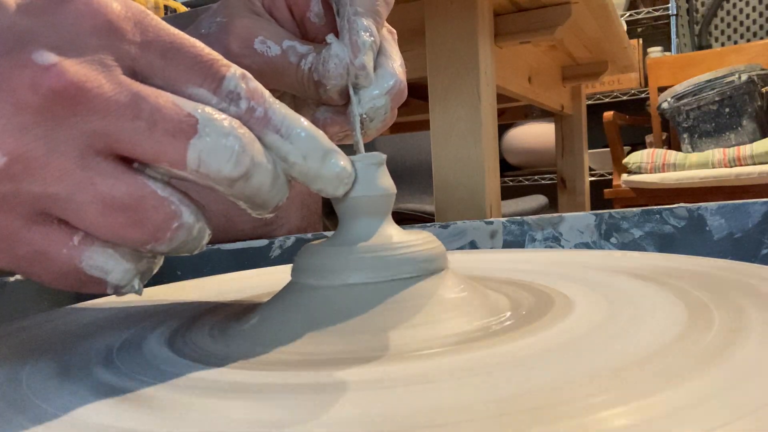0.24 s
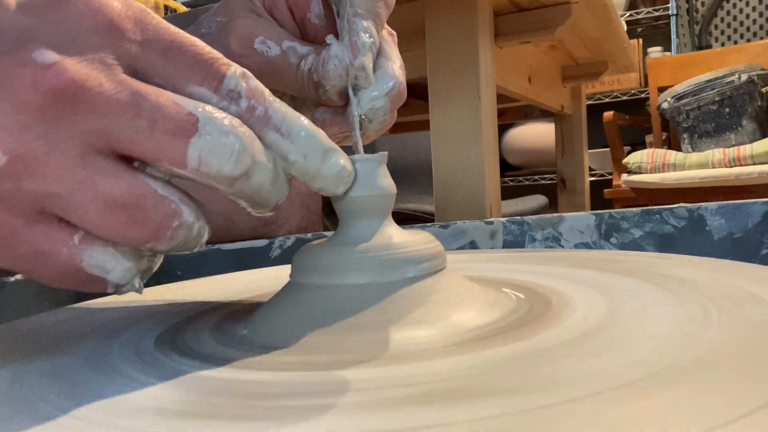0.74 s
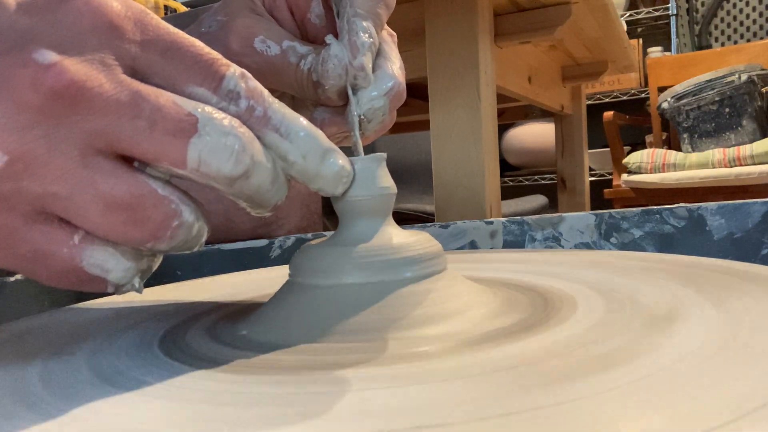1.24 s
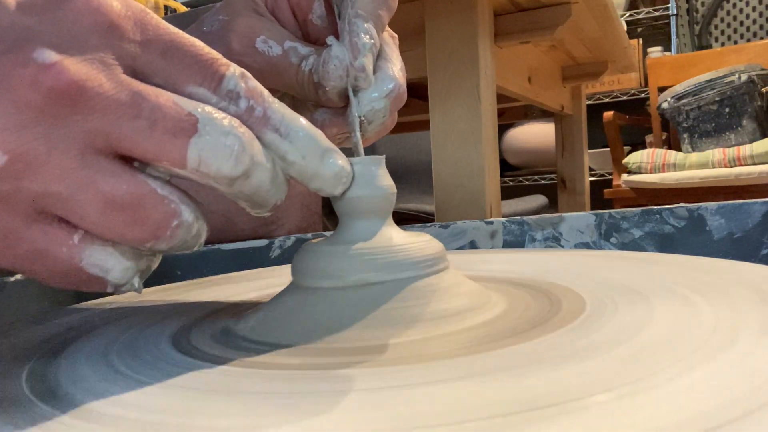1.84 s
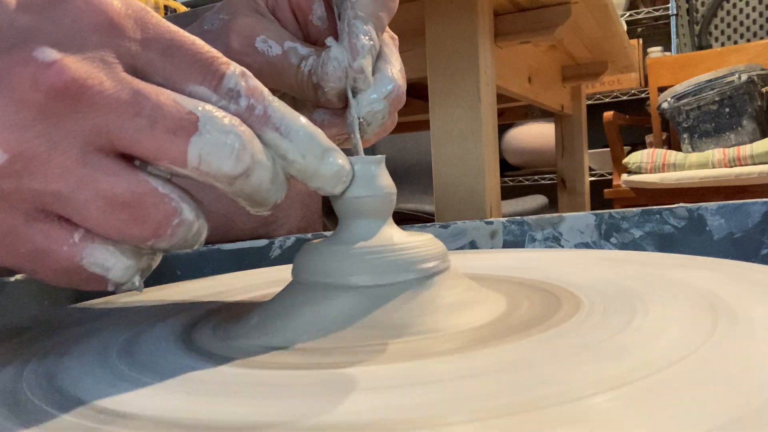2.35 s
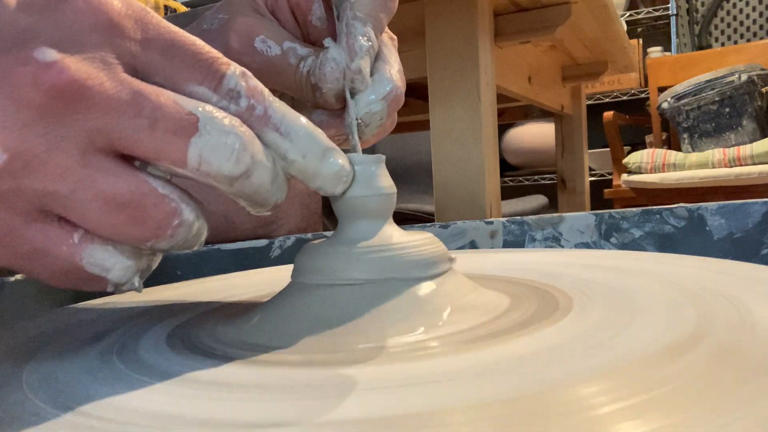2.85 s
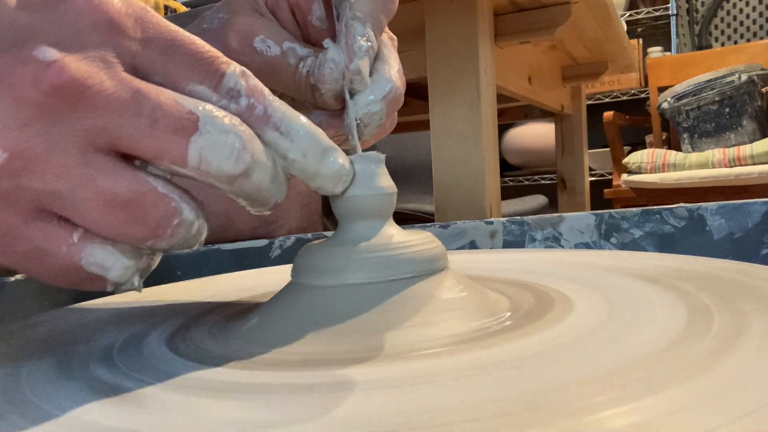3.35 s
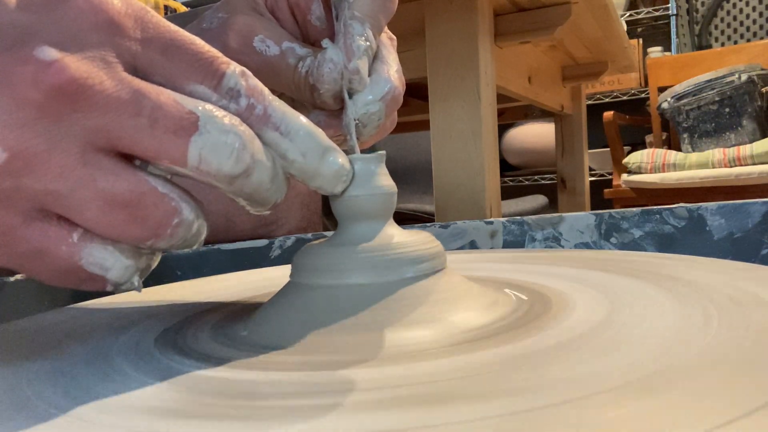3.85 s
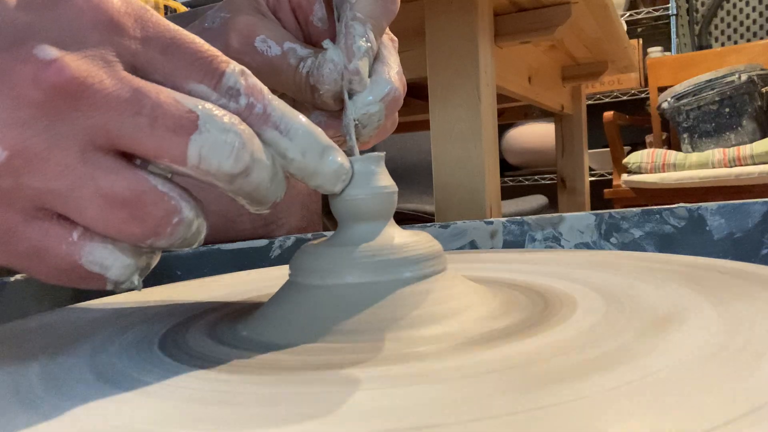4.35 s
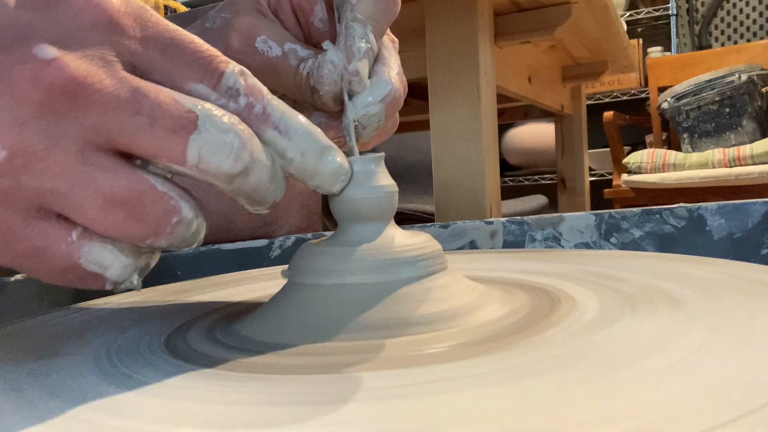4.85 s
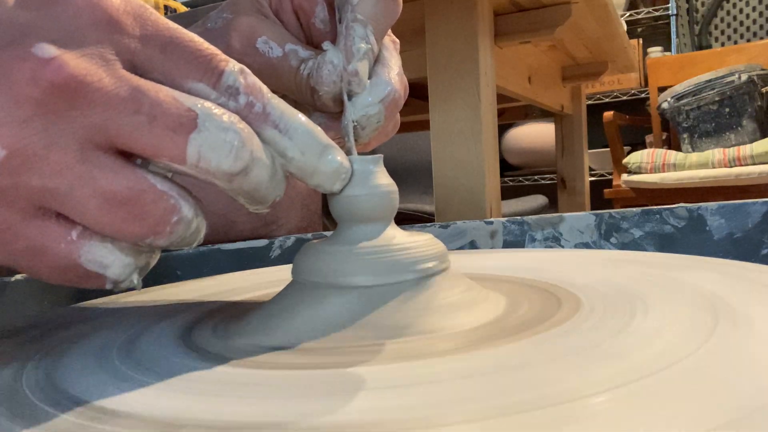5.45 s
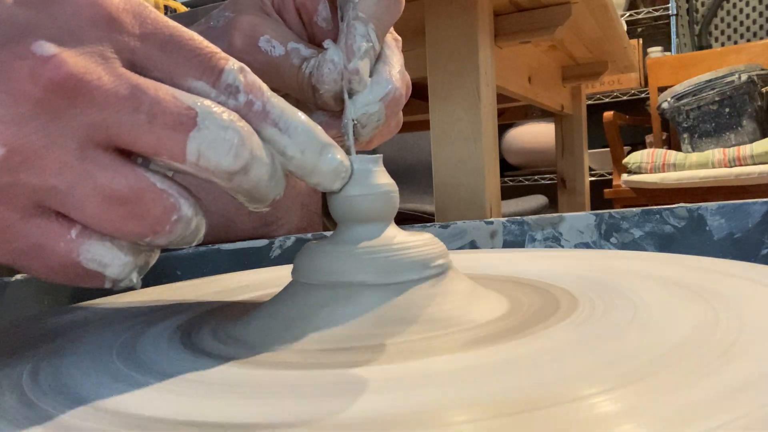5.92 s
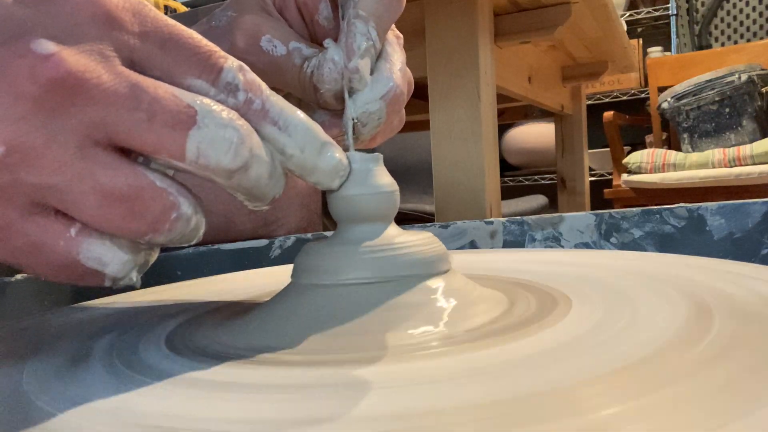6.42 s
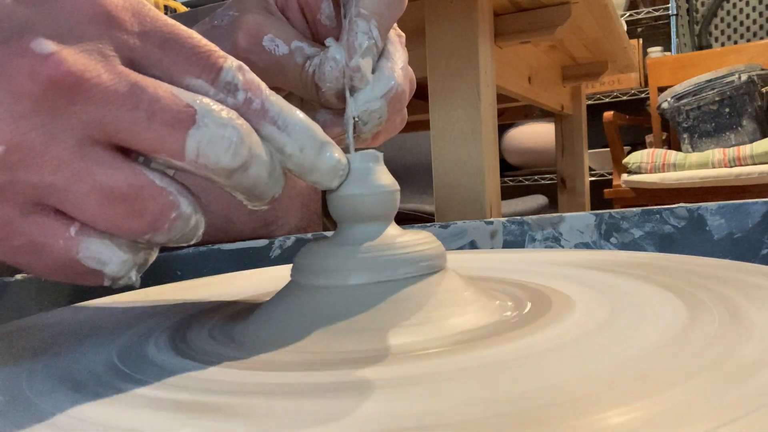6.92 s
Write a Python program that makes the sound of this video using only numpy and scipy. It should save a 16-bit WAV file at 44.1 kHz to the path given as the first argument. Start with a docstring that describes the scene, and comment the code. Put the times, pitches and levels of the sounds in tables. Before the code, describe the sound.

Steady pottery wheel motor in a studio, miked on the pan with little room sound. Low electrical hum and its octave pulse unevenly with wheel and belt, while a thin mid whine bends slightly up and down. Muffled frame knocks, light metallic ticks several times a turn and a brighter crack each half second continue throughout; no start or stop.

```python
"""On the splash pan of an electric potter's wheel stands a phone with two microphone ports; the wheel runs steadily.
The mains-fed motor hums at twice the line frequency, its brushes whine, and the tones throb with belt and wheel.
Bumps in belt and bearings ring the frame and the motor shell, and something in the drive ticks a few times a turn.
Noise pushes ring those modes as knocks, ticks, cracks and squeaks; the clay hisses once over a filtered-noise whirr."""
import sys
import numpy as np
from scipy import signal
from scipy.fft import rfft, irfft, next_fast_len
from scipy.io import wavfile
from scipy.ndimage import uniform_filter1d

SR = 44100
rng = np.random.default_rng(int(sys.argv[2]) if len(sys.argv) > 2 else 0)


def waveform_to_disk(signal):
    """Save audio, clipped to [-1, 1], as 16-bit WAV at the path in sys.argv[1]."""
    frames = np.transpose(np.atleast_2d(signal))
    scaled = np.clip(frames, -1, 1) * 32767
    samples = np.round(scaled).astype(np.int16)
    wavfile.write(sys.argv[1], SR, samples)


N = 316505
M = next_fast_len(N)
T, F = np.arange(N) / SR, np.arange(M // 2 + 1) * SR / M  # time in s, frequency in Hz
SPAN = 2 ** 14  # spectral bins around a mode that its drive fills
SLOW = SPAN * SR / M  # sample rate of such a drive, Hz
HUM_HZ, TURN_HZ, BELT_HZ = 120.07, 2.002, 2.246  # hum, turns of the wheel and laps of the belt per second
# the treble reaches the left port first: lag in s, and the frequency where both ports are in step
PORT_LAG_S, IN_STEP_HZ = 1.96e-4, 8700

# modes of frame and pan, before each sound's own widening and gain:
# [f/Hz, width/Hz, left level/dB per Hz, right level/dB per Hz, left leads/rad]
FRAME = [(93.4, 13, -77.5, -65.5, 1.5), (155, 18, -65, -63.5, 1.5), (182, 12, -66, -65.5, 2.1),
         (211, 24, -68, -65.5, -0.5), (256.2, 30, -68.5, -70.5, -1), (301.5, 33, -69, -70.5, -0.4),
         (362, 17.5, -64, -60.5, 3.5), (381, 18.2, -71, -68, 1.5), (404, 16, -66.5, -70.5, 0.9),
         (445, 24, -79.5, -74.5, 0), (466.2, 12.3, -66.5, -66, 0), (480.4, 6, -72.5, -69, -0.5),
         (518, 20, -85.5, -72.5, -2), (537.4, 14, -87, -72.5, -1.5), (647, 31.5, -80.5, -82, 1.5),
         (746, 34, -85.5, -82.5, -1.5), (917, 47, -89, -87, 1.4), (959, 5.2, -86.5, -79.5, 1.9),
         (996, 60, -98.5, -83.5, 3.5), (1103, 24, -89, -86.5, 1.1), (1170, 24, -88, -90.5, -0.5),
         (1283, 6.8, -83.5, -80, 1.3), (1298, 25.3, -86.5, -88, 1.24)]
# modes of the motor shell, before each sound's own widening and gain:
# [f/Hz, width/Hz, left level/dB per Hz, right level/dB per Hz, left leads/rad]
SHELL = [(1560, 40, -99, -97, 1.1), (1920, 20, -96, -97, 1.8), (2040, 60, -95, -88, -2.8),
         (2150, 90, -97, -89, 0.9), (2280, 50, -98, -90, 1.3), (2525, 90, -98, -90, 1.3),
         (2640, 40, -98, -92, -2.9), (2740, 30, -96, -87, 0.5), (2986, 26, -93, -89, -1.9),
         (3120, 60, -95, -93, 2.2), (3165, 16, -93, -89, -0.2), (3330, 120, -102, -95, 1.6),
         (3770, 60, -101, -97, 1.7), (3930, 200, -100, -98, 1.3), (4165, 110, -100, -98, 0.2),
         (4265, 70, -101, -99, 1.1), (4392, 12, -104, -94, 1.2), (5040, 20, -108, -101, -2.3),
         (5750, 130, -102.5, -100.5, 2.7), (6730, 70, -101, -102, 2.9), (7300, 60, -108, -107, -1.9),
         (8380, 170, -104, -104, -0.1), (8900, 200, -108, -108, 0.0), (9370, 150, -108, -108, 0.3),
         (9840, 60, -104, -104, 1.2), (10780, 60, -109, -109, 2.6), (11070, 30, -107, -107, 3.1),
         (12300, 60, -112, -112, -2.2), (13400, 80, -116, -116, 0.0), (14250, 60, -116, -116, -0.0)]


def undb(db):
    """Amplitude ratio of a level in dB."""
    return 10 ** (np.asarray(db) / 20)


def noise(*shape):
    """Complex noise of power 1."""
    return (rng.standard_normal(shape) + 1j * rng.standard_normal(shape)) / np.sqrt(2)


def walk(rate, size=N, sr=SR):
    """Random levels held 1 / rate s and slewed twice; spread near 1."""
    hold = int(sr / rate)
    steps = np.repeat(rng.standard_normal(size // hold + 1), hold)
    return 1.3 * uniform_filter1d(uniform_filter1d(steps, hold), hold)[:size]


def bump(s, width_s):
    """A smooth hump of height 1."""
    return np.exp(-.5 * ((T - s) / width_s) ** 2)


def sway(rows):
    """Sum of slow cosines locked to the off-centre wheel's turn and the uneven belt's lap."""
    total = 0
    for per_turn, per_lap, depth, crest_s in rows:
        sway_hz = round(per_turn) * TURN_HZ + round(per_lap) * BELT_HZ
        total = total + depth * np.cos(2 * np.pi * sway_hz * (T - crest_s))
    return total


def throb(db, rows, flicker, rate, extra=0):
    """Level in dB of a tone that sways with wheel and belt and flickers a little by chance."""
    amplitude = np.abs(1 + sway(rows) + extra + flicker * walk(rate))
    return db + 20 * np.log10(amplitude + 0.019)


def ports(left_db, right_db, lead):
    """Gain and phase of one source at the two ports; with a positive lead the left port is ahead in phase."""
    left = undb(left_db) * np.exp(.5j * lead)
    right = undb(right_db) * np.exp(-.5j * lead)
    return np.array([left, right]).reshape(2, -1)


def tone(db, phase, left_db, right_db, lead):
    """A sine at both ports, its rms level db plus each port's own gain."""
    return np.sqrt(2) * np.real(ports(left_db, right_db, lead) * undb(db) * np.exp(1j * phase))


def mode(hz, width_hz, f):
    """Steep band-pass response of one resonance, gain 1 at the centre."""
    return (1j * f * width_hz / (hz ** 2 - f ** 2 + 1j * f * width_hz)) ** 2


def add(out, drive, hz, width_hz, gains):
    """Ring one mode with a slow complex drive, shifted up to the mode; drive power 1 is 0 dB per Hz."""
    first = max(int(hz * M / SR) - SPAN // 2, 0)
    bins = slice(first, first + SPAN)
    spectrum = np.fft.fft(drive) * np.sqrt(M * SR / 2 / SPAN)
    out[:, bins] += gains * mode(hz, width_hz, F[bins]) * spectrum


def ringing(modes, flicker_db, rate, repeat, loose, surge_db):
    """Each mode is shaken by its own bumps, a share repeating every turn; all surge twice a turn and by chance.
    A loose share reaches each port by unrelated paths."""
    out = np.zeros((2, len(F)), complex)
    t = np.arange(SPAN) / SLOW
    surge = surge_db * np.cos(4 * np.pi * TURN_HZ * (t - .32)) + 0.76 * walk(3.05, size=SPAN, sr=SLOW)
    for hz, width, left, right, lead in modes:
        each_turn = np.resize(noise(round(SLOW / TURN_HZ)), SPAN)
        shared = np.sqrt(repeat) * each_turn + np.sqrt(1 - repeat) * noise(SPAN)
        drive = np.sqrt(1 - loose) * shared + np.sqrt(loose) * noise(2, SPAN)
        level = undb(surge + flicker_db * walk(rate, size=SPAN, sr=SLOW))
        add(out, drive * level, hz, 1.51 * width, ports(left, right, lead))
    return out


def blows(events, modes, spread_hz, damp, gain_db, rough):
    """Short pushes, rough or smooth, into the modes, most into those near the pitch of the blow.
    Each event is (start s, dB before gain_db, pitch Hz, rise s)."""
    t = np.arange(int(.2 * SLOW)) / SLOW
    grit = noise(len(events), len(t))
    out = np.zeros((2, len(F)), complex)
    for hz, width, left, right, lead in modes:
        if min(abs(hz - event[2]) for event in events) > 2 * spread_hz:
            continue
        drive = np.zeros(SPAN + len(t), complex)
        for (s, db, pitch, rise), grain in zip(events, grit):
            envelope = t / rise * np.exp(1 - t / rise)
            push = envelope * (grain[0] / abs(grain[0]) + rough * grain)  # steady part at a chance phase
            nearness = np.exp(-((hz - pitch) / spread_hz) ** 2)
            start = max(int(s * SLOW), 0)
            drive[start:start + len(t)] += undb(db + gain_db) * nearness * push
        half = (left - right) / 4  # half the mode's level difference, split over both ports
        # put the push on the mode's own pitch
        centre = np.exp(2j * np.pi * min(hz / SLOW, .5) * np.arange(SPAN))
        add(out, drive[:SPAN] * centre, hz, damp * width, ports(half, -half, lead))
    return out


def speed_sway():
    """Off-centre wheel and uneven belt load the motor and sway its speed, in Hz of the whine's pitch."""
    # cosines of the motor's speed: [times per turn, times per belt lap, depth/Hz, crest t/s]
    speed_rows = [(1, 0, 5.55, .415), (0, 1, 4.5, .336), (1, 1, .6, .084), (2, 1, .55, .106),
                  (0, 2, .4, .049)]
    return sway(speed_rows)


def lurches():
    """A brief swell of the hum, then a brief gap, as shares of its amplitude."""
    # lurches of the hum: [crest t/s, surge/share of amplitude, drop/share of amplitude]
    lurch_rows = [(.11, .05, .35), (.42, .05, 0.12), (.55, .05, .2), (.83, .1, 0.46), (1.34, .05, .2),
                  (1.83, .05, 0.27), (2.39, 0.23, 0.44), (2.845, 1, 0.68), (2.97, .05, 0.52),
                  (3.04, .05, 0.1), (3.47, 0.081, 0.42), (3.87, 0.99, .1), (3.97, .05, 0.23),
                  (4.4, 0.17, 0.22), (4.84, 0.1, 0.33), (5.33, 0.11, 0.32), (5.93, 0.41, .1),
                  (6.39, 0.12, 0.52), (6.85, .1, 0.59), (7.02, .1, 0.21)]
    return sum(surge * bump(s, .011) - drop * bump(s + .041, .015) for s, surge, drop in lurch_rows)


def motor_hum(slowing_hz):
    """Multiples of the rectified line; the higher ones waver, most growing when the load slows the motor."""
    # level sway of the hum: [times per turn, times per belt lap, depth/share of amplitude, crest t/s]
    hum_sway = [(1, 0, .45, .287), (0, 1, .26, .245), (0, 2, .22, .127), (1, 2, .1, .052), (-1, 2, .1, .36),
                (0, 4, .08, .05), (2, 0, .06, .019), (0, 3, .06, .001), (4, 0, .05, .098),
                (-1, 3, .05, .058)]
    # phase sway of the hum: [times per turn, times per belt lap, depth/rad, crest t/s]
    phase_sway = [(1, 0, .11, .382), (0, 1, .11, .379), (0, 2, .2, .168), (1, 2, .1, .097),
                  (0, 4, .07, .084), (-1, 1, .13, .382)]
    # level sway of the octave: [times per turn, times per belt lap, depth/share of amplitude, crest t/s]
    octave_sway = [(1, 0, .17, .292), (0, 1, .2, .203), (0, 2, .07, .199), (-2, 2, .08, 1.407),
                   (-1, 1, .07, 3.314)]
    # brief swells and dips of the octave: [t/s, change/share of amplitude]
    octave_wavers = [(.08, 0.13), (.33, 0.5), (1.0, -0.3), (1.29, 0.33), (1.38, -0.24), (1.45, 0.034),
                     (1.96, 0.24), (2.65, -0.3), (2.83, 0.37), (3.0, -0.51), (3.3, .2), (3.55, .3),
                     (3.9, -0.012), (4.26, 0.2), (4.37, -0.71), (5.73, -0.53), (6.2, 0.46), (6.3, -.35)]
    # higher multiples: [multiple, left level/dB, right level/dB, left leads/rad, swell/dB per Hz of slowing]
    multiples = [(3, -64.5, -71, -1.7, 0.35), (4, -71, -65, 1.2, 0.82), (5, -69.5, -66.5, -1.8, 0),
                 (7, -74.5, -74, 1.8, 0.23), (8, -76.5, -74, 1.35, 0)]
    line = 2 * np.pi * HUM_HZ * T
    hum_db = throb(-38, hum_sway, 0.14, 16, extra=lurches())
    out = tone(hum_db, line + sway(phase_sway) + 0.15 * walk(6), 0.93, 1.3, 0.93)
    wavers = sum(change * bump(s, 0.023) for s, change in octave_wavers)
    octave_db = throb(-45, octave_sway, .05, 18, extra=wavers)
    octave_phase = 2 * line + 2.4 + .2 * walk(7)  # its offset deepens the troughs of the hum
    out += tone(octave_db, octave_phase, -1.4, 2.1, 0.0086)
    for k, left, right, lead, swell in multiples:
        phase = k * (line + 0.018 * walk(5)) + rng.uniform(0, 2 * np.pi)
        out += tone(swell * slowing_hz + 4.2 * walk(8), phase, left, right, lead)
    return out


def whine(speed_hz):
    """Brushes crossing the commutator bars; louder and lower as the load slows the motor."""
    # multiples of the whine: [multiple, left level/dB, right level/dB, left leads/rad]
    whine_orders = [(1, 1, 1, 0.067), (2, -24, -27, 2.7), (3, -32, -32, 1)]
    hz = 444.2 + speed_hz
    db = -52.5 - 0.36 * speed_hz + 1.5 * walk(13)
    phase = 2 * np.pi * np.cumsum(hz + 1.2 * walk(25)) / SR  # pitch jitter in Hz
    lead_shift = 0.067 * (hz - hz.mean())  # the left port's phase lead grows as the pitch rises
    return sum(tone(db, k * phase, left, right, lead + lead_shift) for k, left, right, lead in whine_orders)


def drive_tone():
    """The 28th order of the wheel's turn; the off-centre load speeds and slows it once a turn."""
    # level sway: [times per turn, times per belt lap, depth/share of amplitude, crest t/s]
    drive_sway = [(1, 0, .3, .373), (2, 0, .21, .194), (3, 0, .1, .103), (4, 0, .08, .002),
                  (0, 1, .07, .005), (1, 1, .12, .126), (-1, 1, .15, 2.318)]
    wobble = 0.85 * np.cos(2 * np.pi * TURN_HZ * (T - .08))
    phase = 2 * np.pi * 28 * TURN_HZ * T + wobble
    return tone(throb(-51.5, drive_sway, 0.082, 5.1), phase, .1, .1, 0.27)


def thin_lines():
    """A faint tone, mostly on the right, and the sixth multiple of the hum, both with a wandering phase."""
    # level sway of the faint tone: [times per turn, times per belt lap, depth/share of amplitude, crest t/s]
    faint_sway = [(1, 0, .22, .38), (0, 1, .18, .386)]
    # level sway of the sixth: [times per turn, times per belt lap, depth/share of amplitude, crest t/s]
    sixth_sway = [(1, 0, .45, .273), (0, 1, .45, .19), (1, 2, .12, .012), (-1, 2, .15, .328),
                  (2, 1, .17, .015)]
    faint_phase = 2 * np.pi * 573.1 * T + 0.94 * walk(4.6)
    faint = tone(throb(-64.5, faint_sway, 0.34, 12), faint_phase, -1.6, 4.6, -.1)
    sixth_phase = 2 * np.pi * 6 * HUM_HZ * T + 0.33 * walk(6.6)
    return faint + tone(throb(-70, sixth_sway, 0.33, 12), sixth_phase, -4.5, 6.6, -1.3)


def frame_and_shell():
    """Bumps in belt and bearings keep the modes of frame and motor shell ringing."""
    frame = ringing(FRAME, flicker_db=2.0, rate=14, repeat=0.15, loose=0.13, surge_db=0.13)
    shell_low = ringing(SHELL[:18], flicker_db=1.2, rate=11, repeat=0.041, loose=0.57, surge_db=0.07)
    shell_high = ringing(SHELL[18:], flicker_db=2.5, rate=7, repeat=0.027, loose=0.22, surge_db=1.0)
    return frame + undb(0.5) * (shell_low + shell_high)


def frame_knocks():
    """Mostly smooth pushes ring the frame modes near each knock's pitch."""
    # knocks on the frame: [t/s, level/dB before the blow's gain, f/Hz that rings most]
    knock_rows = [(0.29, -35.5, 156), (0.312, -32, 379), (0.446, -42, 376), (0.672, -42, 300),
                  (0.723, -34, 385), (0.804, -36, 381), (0.891, -37, 212), (1.214, -35.5, 382),
                  (1.341, -42, 300), (1.4, -38.5, 211), (1.47, -38, 397), (1.508, -35, 270),
                  (1.693, -40.5, 381), (1.763, -39.5, 293), (1.872, -38, 372), (1.974, -40, 390),
                  (2.122, -46, 396), (2.196, -44, 313), (2.283, -35.5, 212), (2.293, -46.4, 510),
                  (2.3, -42, 403), (2.405, -41, 215), (2.697, -30, 368), (2.789, -40, 523),
                  (2.802, -40.5, 377), (2.871, -41, 377), (2.946, -33, 378), (3.037, -37, 398),
                  (3.058, -40, 205), (3.198, -33.5, 371), (3.293, -42, 514), (3.304, -36, 381),
                  (3.42, -31.5, 371.5), (3.538, -40, 390), (3.634, -35, 365), (3.651, -41, 305),
                  (3.791, -44, 512), (3.805, -40.5, 303), (3.812, -33.5, 382), (3.85, -32, 155),
                  (3.903, -36.5, 380), (3.94, -40, 158), (3.989, -37.5, 387), (4.202, -35.5, 408),
                  (4.278, -47, 303), (4.313, -32.5, 378), (4.37, -40, 156), (4.478, -34.5, 391),
                  (4.733, -34.5, 387), (4.811, -38, 390), (4.82, -36, 155), (4.98, -35, 383),
                  (4.986, -40, 291), (5.22, -34, 385), (5.338, -47, 305), (5.447, -36.5, 373),
                  (5.476, -37, 286), (5.7, -52, 514), (5.703, -35.5, 385), (5.785, -37, 369),
                  (5.801, -40, 302), (5.871, -43.5, 222), (5.947, -39, 376), (5.978, -43.5, 303),
                  (6.111, -44.5, 372), (6.183, -39, 370), (6.193, -42.5, 218), (6.31, -40, 381),
                  (6.39, -42, 210), (6.451, -34.5, 372), (6.566, -42.5, 378), (6.58, -42, 211),
                  (6.807, -42, 300), (6.807, -37.5, 379), (6.945, -34, 381), (7.032, -47, 524),
                  (7.115, -39.5, 466)]
    knocks = [(s - 0.0055, db, hz, 0.021) for s, db, hz in knock_rows]  # starts 5.5 ms ahead of t
    return blows(knocks, FRAME, spread_hz=18.2, damp=3.5, gain_db=-38.0, rough=0.31)


def all_ticks():
    """The clear ticks and 30 small ones at chance moments, a grain of friction."""
    # clear ticks: [t/s, level/dB before the blow's gain, f/Hz that rings most, lower ring level/dB before gain]
    clear = [(0.124, -57.5, 3970, -67), (0.324, -50, 4150, -69), (0.396, -59, 4130, -63),
             (0.497, -56, 4150, -67), (0.636, -60.5, 4010, -58), (0.812, -55.5, 4170, -60.5),
             (1.029, -57, 4170, -66), (1.101, -57, 4100, -63), (1.207, -58, 4080, -69),
             (1.328, -51, 3940, -63), (1.388, -63.5, 4000, -63), (1.514, -60, 4170, -66),
             (1.61, -57.5, 4120, -69), (1.818, -54.7, 4100, -60), (1.885, -61, 4200, -65),
             (1.952, -61.5, 4130, -67), (2.085, -57, 4100, -65), (2.319, -53, 4170, -56.5),
             (2.379, -57.5, 4120, -65), (2.579, -51, 4020, -59), (2.626, -62.5, 4100, -81),
             (2.697, -59.5, 4200, -65.5), (2.819, -48, 4020, -57), (3.071, -55, 4100, -56.5),
             (3.136, -59, 4200, -65), (3.317, -53, 4150, -57), (3.402, -60, 4220, -66),
             (3.6, -49, 4200, -69), (3.708, -58.5, 4210, -71), (3.872, -60.5, 4050, -57),
             (4.099, -53.5, 4070, -57), (4.321, -59, 4100, -71), (4.507, -61, 4170, -64),
             (4.616, -58.5, 4190, -72), (4.664, -58, 4120, -67), (4.772, -59, 4150, -65),
             (4.83, -59.5, 4150, -60), (5.096, -59, 4190, -58), (5.316, -53, 3950, -61),
             (5.498, -59.9, 4170, -61), (5.605, -55, 4160, -67), (5.815, -55.5, 4200, -62),
             (5.924, -58, 4120, -66), (6.077, -53, 4100, -66), (6.31, -61.5, 4210, -63.5),
             (6.515, -62.5, 4130, -69), (6.573, -55.5, 3900, -64.5), (6.624, -61.5, 4140, -60),
             (6.704, -57.5, 3800, -70), (6.814, -49, 4090, -69), (6.874, -53.5, 4100, -59),
             (6.967, -57.5, 4050, -68), (7.06, -53, 4160, -58), (7.113, -54.5, 4040, -63)]
    s, strength, pitch, low = rng.random((30, 4)).T
    db = -63.5 + 7 * (strength - .5)
    small = np.transpose([s * (T[-1] - .05), db, 4100 + 600 * (pitch - .5), db - 12 + 8 * low])
    return np.vstack([clear, small])


def drive_ticks():
    """Something in the drive ticks: each rough push also stirs shell modes below and above its own pitch."""
    ticks = all_ticks() - [.014, 0, 0, 0]  # starts 14 ms ahead of t
    rise_s = .0055
    main = [(s, db, hz, rise_s) for s, db, hz, _ in ticks]
    lower = [(s, low_db, 3250, rise_s) for s, _, _, low_db in ticks]
    mean_db = ticks[:, 1].mean()
    # the top sparkle follows a share of the tick's strength
    sparkle = [(s, -71 + 0.52 * (db - mean_db), 8000, .005) for s, db, _, _ in ticks]
    return (blows(main, SHELL, spread_hz=263, damp=0.68, gain_db=-41.5, rough=1.05)
            + blows(lower, SHELL, spread_hz=190, damp=4.1, gain_db=-42.0, rough=2.4)
            + blows(sparkle, SHELL, spread_hz=4300, damp=14.0, gain_db=-52.5, rough=2.86))


def shell_cracks():
    """A brighter crack once a turn: rough pushes into widely damped shell modes."""
    # cracks: [t/s where the push crests, level/dB before the blow's gain]
    crack_rows = [(0.309, -68.5), (0.817, -74.5), (1.326, -72), (1.813, -74.5), (2.324, -83), (2.827, -69),
                  (3.321, -73), (3.805, -78), (4.31, -69), (4.816, -71), (5.318, -78), (5.823, -73),
                  (6.31, -73.5), (6.813, -76)]
    rise_s = 0.0046
    cracks = [(s - rise_s, db, 4900, rise_s) for s, db in crack_rows]
    return blows(cracks, SHELL, spread_hz=1000, damp=15, gain_db=-35.0, rough=2.8)


def shell_squeaks():
    """Short squeaks: smoother pushes confined to the shell modes close to each pitch."""
    # squeaks: [start t/s, level/dB before the blow's gain, f/Hz, rise/s]
    squeak_rows = [(1.085, -64, 3165, 0.0052), (1.309, -49, 3140, 0.004), (1.334, -60, 3165, 0.014),
                   (1.376, -59, 3150, 0.0069), (1.408, -60.5, 3165, 0.0083), (1.441, -62, 3140, 0.004),
                   (3.308, -58, 3165, 0.008), (3.34, -68, 3150, 0.016), (3.86, -67, 3165, 0.013),
                   (5.1, -71, 3165, 0.028), (7.05, -56.5, 3330, 0.0068)]
    return blows(squeak_rows, SHELL, spread_hz=38, damp=4.7, gain_db=-37.0, rough=.4)


def clay_hiss():
    """One short thin hiss from the clay: noise through a wide treble band-pass."""
    start_s, rise_s, hold_s = 2.6, .06, 0.2
    shape = np.interp(T - start_s, np.cumsum([0, rise_s, hold_s, rise_s]), [0, 1, 1, 0])
    hiss = rng.standard_normal(N) * undb(-74) * shape ** 2
    lead = 2 * np.pi * PORT_LAG_S * (F - IN_STEP_HZ)
    return rfft(hiss, M) * mode(9700, 7000, F) * ports(8, 7.3, lead)


def flickering_noise(flicker_db, rate):
    """Spectrum of a broad noise that flickers around 0 dB per Hz."""
    return rfft(rng.standard_normal(N) * undb(flicker_db * walk(rate)), M) * np.sqrt(SR / 2)


def whirr():
    """Broad air and bearing noise; the part common to both ports flickers separately in four bands."""
    # smooth whirr between the modes, ahead of the low cut:
    # [f/Hz, left level/dB per Hz, right level/dB per Hz, likeness of left and right/0-1]
    whirr_curve = [(40, -83, -86, 0.6), (71.6, -71.5, -82, 0.7), (133, -69.5, -71.5, 0.98),
                   (342, -79, -73, 0.92), (588, -91.5, -79, 0.2), (875, -92, -101.5, 0.9),
                   (1550, -99, -100, 0), (2320, -102, -99, 0), (3330, -105, -102, 0.8),
                   (5300, -110, -109, 0), (7800, -109, -109, 0.9), (10400, -110, -110, 0.1),
                   (10640, -115, -115, 1), (14900, -120, -120, 1)]
    hz, *curves = np.transpose(whirr_curve)
    left, right, like = (np.interp(np.log(F + 1), np.log(hz), curve) for curve in curves)
    lead = 2 * np.pi * PORT_LAG_S * (F - IN_STEP_HZ) * (F > 3000)
    band = np.digitize(F, [300, 1500, 5000])
    common = sum(flickering_noise(1.0, 6.5) * (band == k) for k in range(4))
    separate = [flickering_noise(1.0, 7.7), flickering_noise(0.93, 7.8)]
    low_cut = F ** 2 / (F ** 2 + 35 ** 2)
    alike = np.sqrt(like) * ports(left, right, lead) * common
    return low_cut * (alike + np.sqrt(1 - like) * undb([left, right]) * separate)


def scene():
    """Motor tones in time plus all the noisy sounds, summed as spectra."""
    speed_hz = speed_sway()
    tones = motor_hum(-speed_hz) + whine(speed_hz) + drive_tone() + thin_lines()
    blow_sounds = frame_knocks() + drive_ticks() + shell_cracks() + shell_squeaks()
    noisy = frame_and_shell() + blow_sounds + clay_hiss() + whirr()
    return tones + irfft(noisy, M)[:, :N]


def record(dry):
    """The phone cuts the top above 15150 Hz; the sound ends in a fade of 3 ms."""
    fade = np.clip((T[-1] - T) / .003, 0, 1)
    top_cut = signal.ellip(10, .2, 60, 15150, fs=SR, output="sos")
    return fade * signal.sosfilt(top_cut, dry)


dry = scene()
out = record(dry)
waveform_to_disk(out)
```